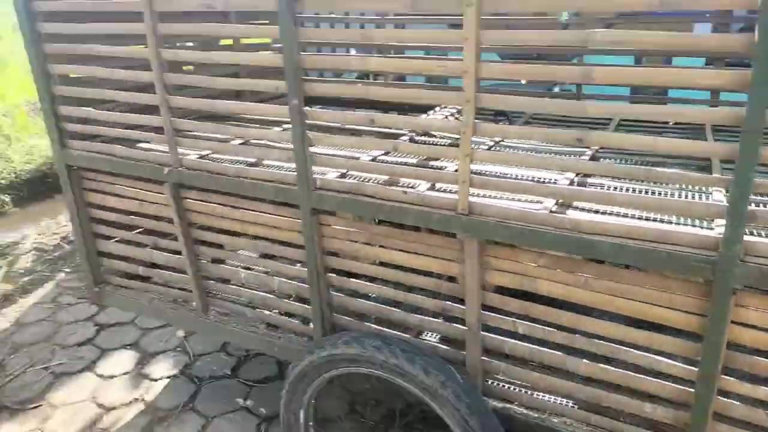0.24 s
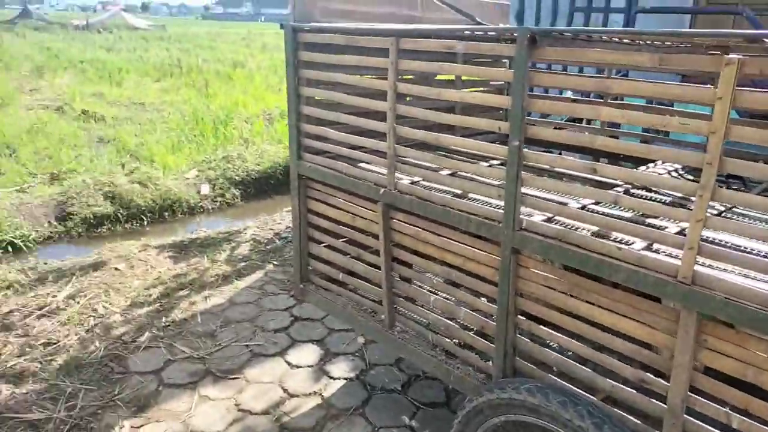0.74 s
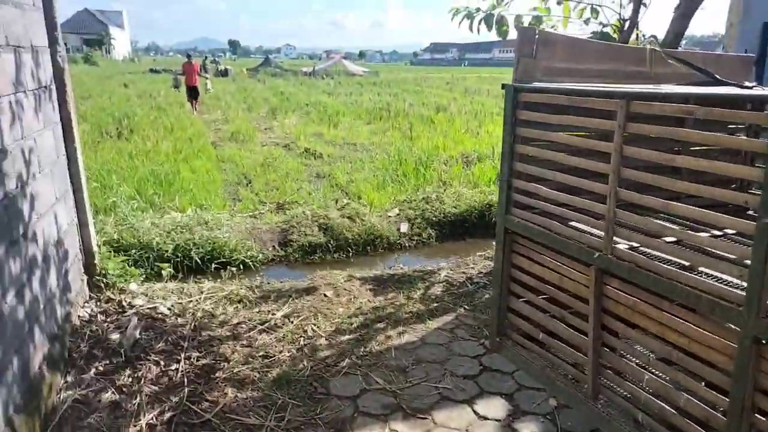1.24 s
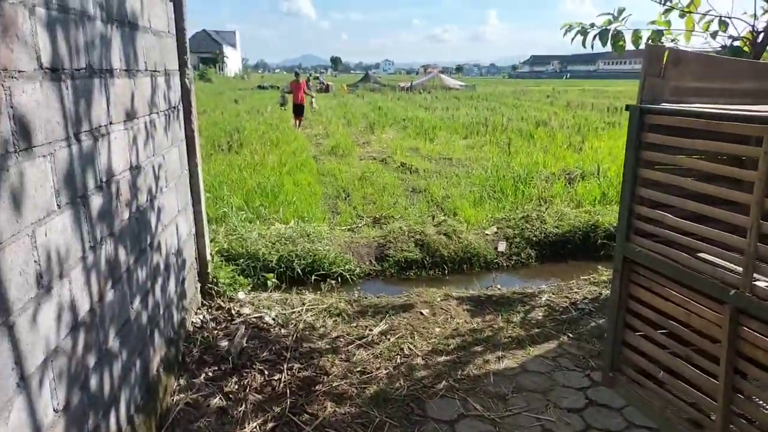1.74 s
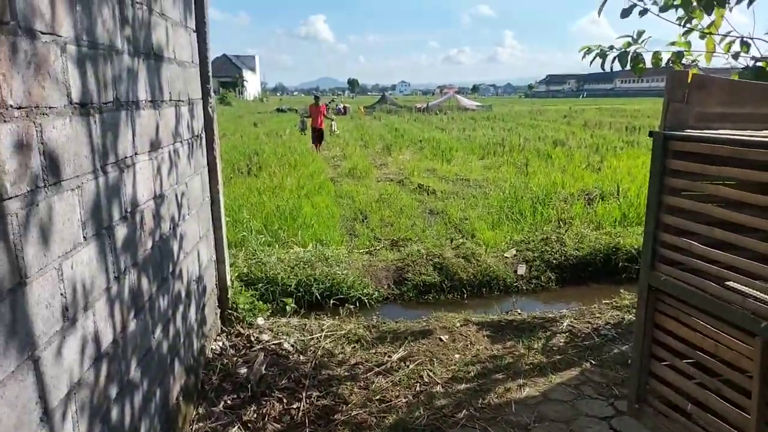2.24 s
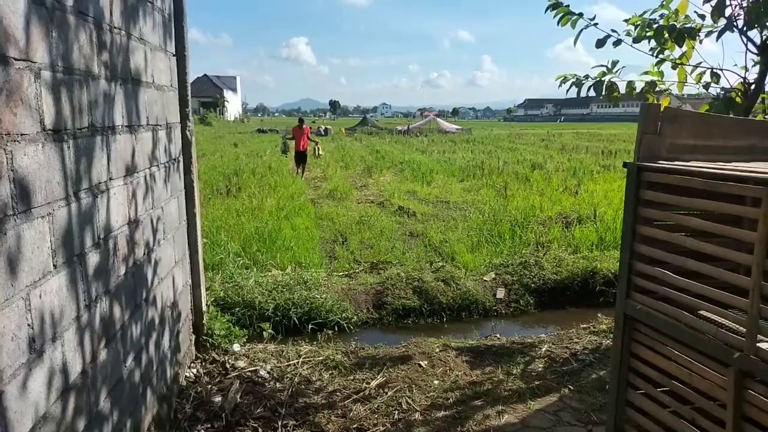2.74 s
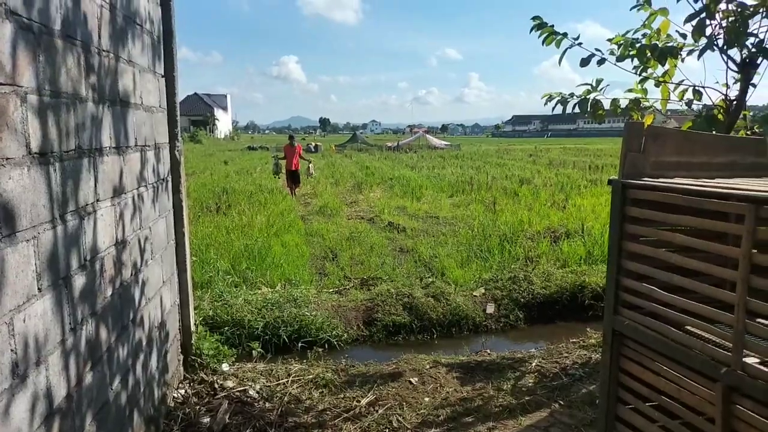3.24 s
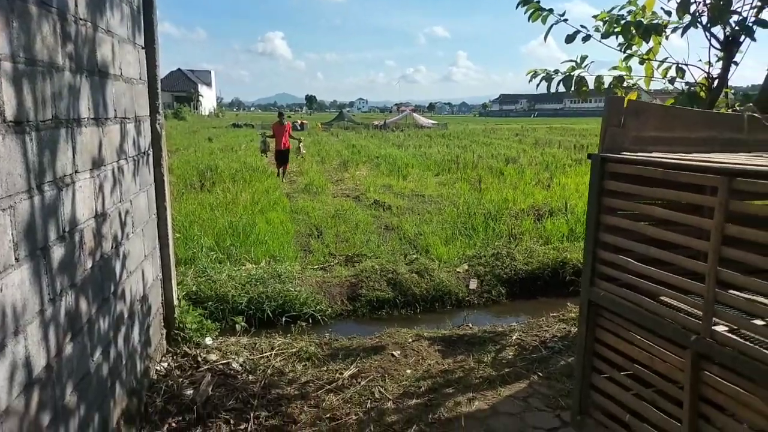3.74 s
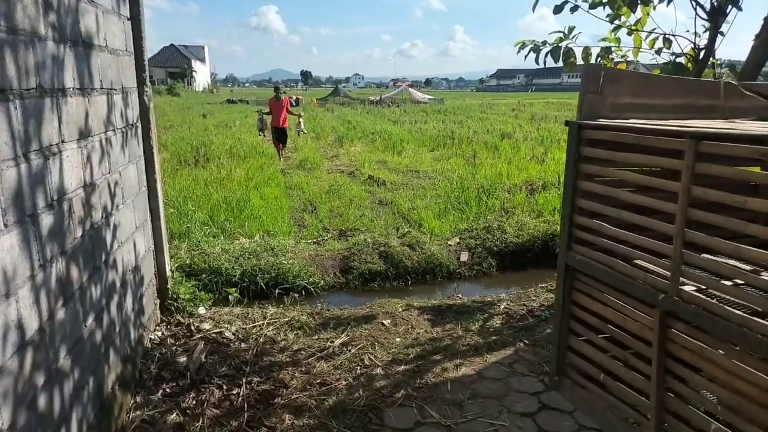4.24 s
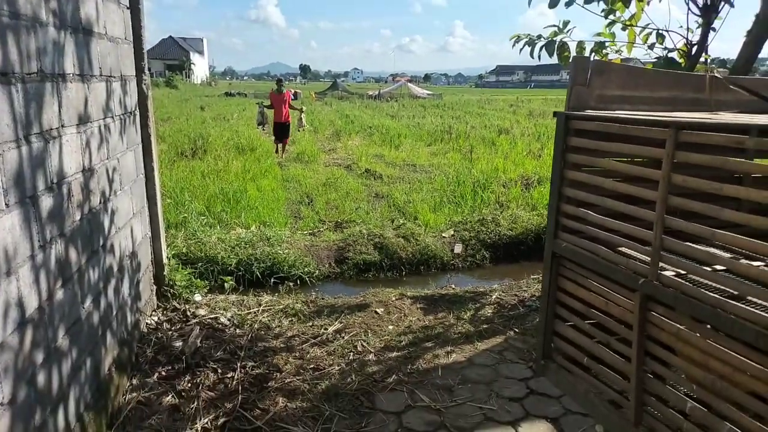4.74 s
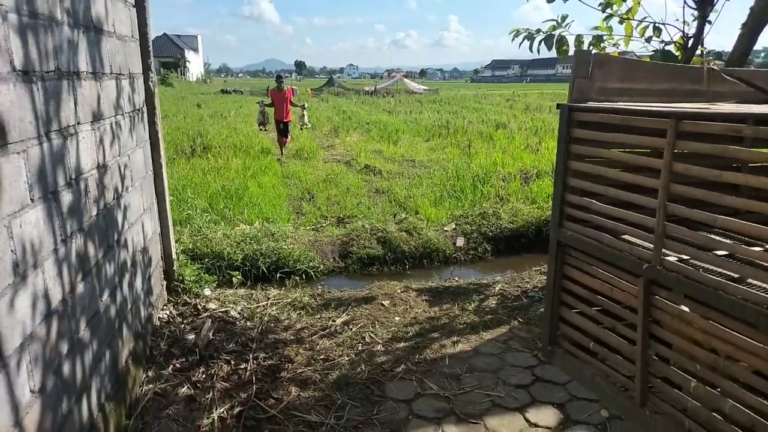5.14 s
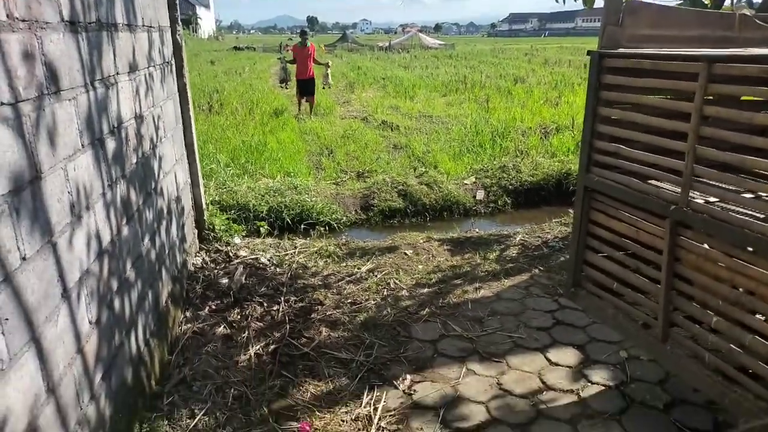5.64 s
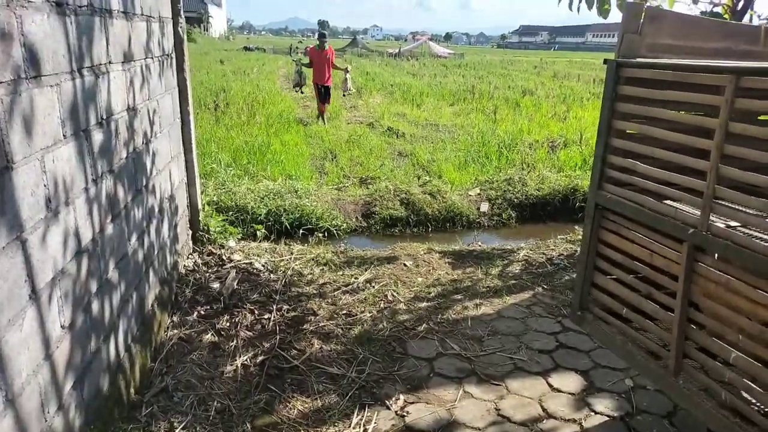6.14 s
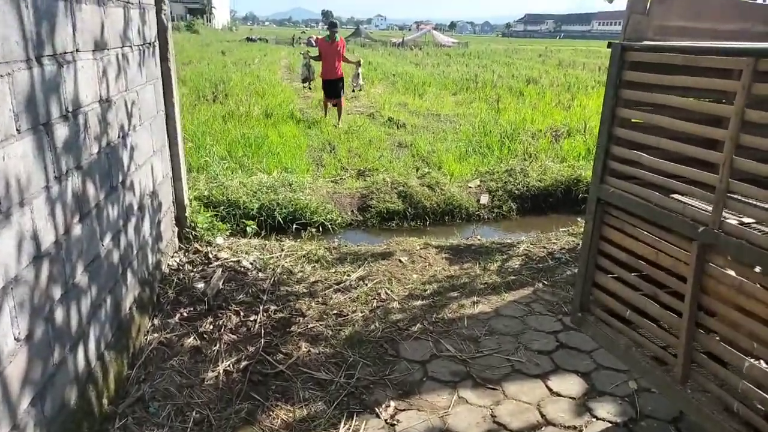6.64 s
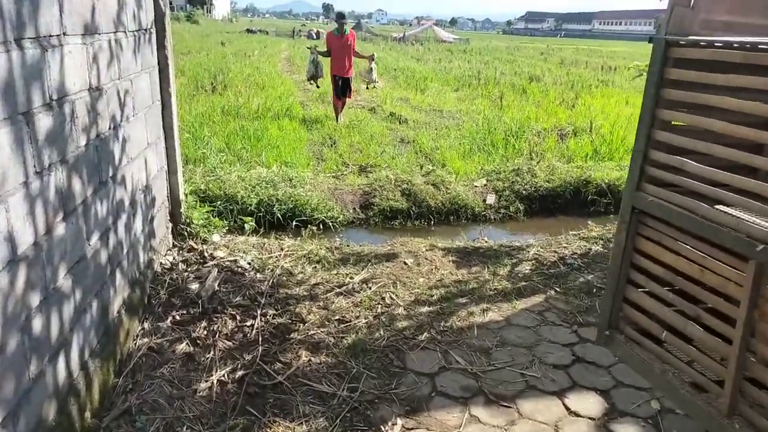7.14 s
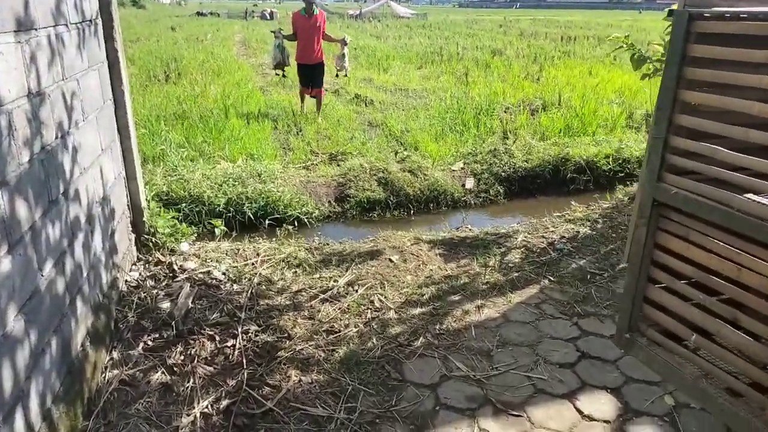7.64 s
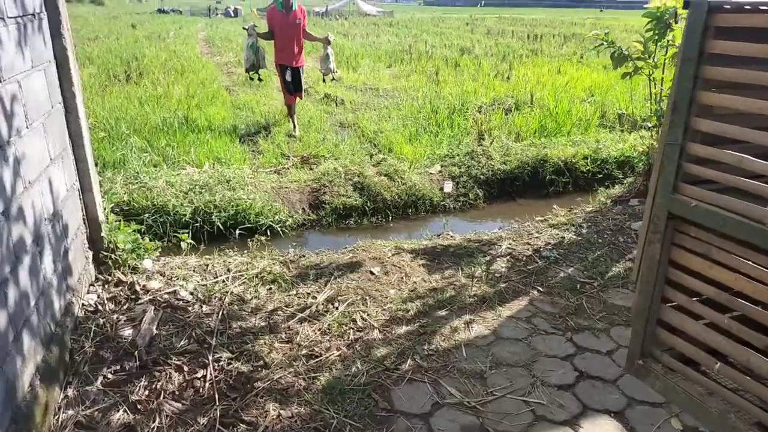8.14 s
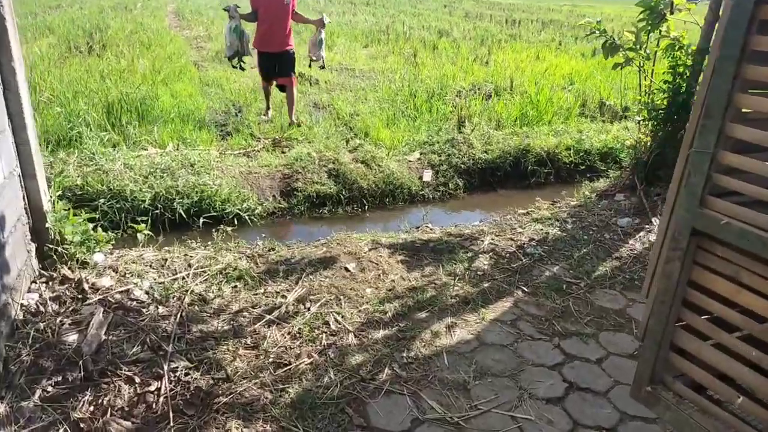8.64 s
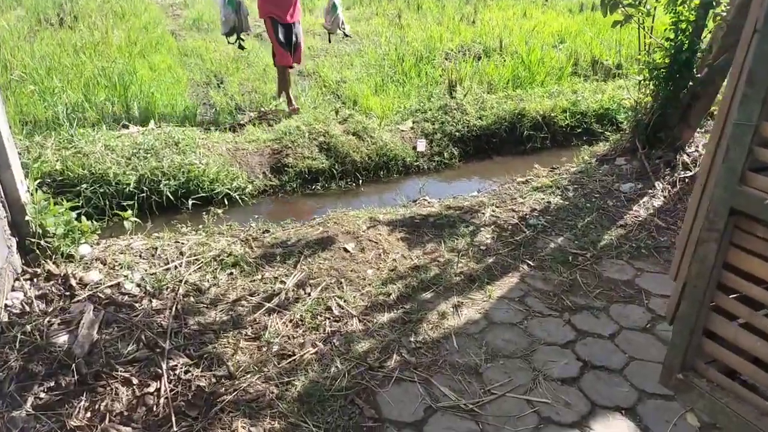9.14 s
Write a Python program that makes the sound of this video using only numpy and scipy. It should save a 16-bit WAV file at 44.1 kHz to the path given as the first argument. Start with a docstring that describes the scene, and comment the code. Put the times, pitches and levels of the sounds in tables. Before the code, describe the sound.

Domestic ducks quack in short, hoarse calls, about three a second, at the edge of a field. Softer quacks come first, then louder ones mixed with a few distant answers, each with a slight echo from a wall and a slatted cage. Dry leaves and straw rustle and crunch close to the microphone throughout. A few small bird peeps sound early on, over a faint motor hum and light wind.

```python
"""At the edge of a field, beside a slatted cage and a wall, ducks quack in short hoarse calls.
Pulses and puffs of air ring each duck's chest, neck and throat; slats and wall echo the calls.
Dry leaves and straw rustle and crunch close by in tiny snaps, and small birds or ducklings peep.
A far motor hums, light wind puffs on the microphone, and a limiter holds down the loudest calls."""
import sys
import numpy as np
from scipy import signal
from scipy.fft import rfft, irfft
from scipy.io import wavfile
from scipy.ndimage import uniform_filter1d, minimum_filter1d

SR = 44100
rng = np.random.default_rng(int(sys.argv[2]) if len(sys.argv) > 2 else 0)


def bounce(signal):
    """Save signal as a 16-bit WAV file at the path given by the first command-line argument."""
    frames = np.transpose(np.atleast_2d(signal))
    limited = np.clip(frames, -1, 1)
    pcm = np.round(limited * 32767).astype(np.int16)
    wavfile.write(sys.argv[1], SR, pcm)


N = 414540
LEAD_S = .03  # murmur ahead of each quack

# Duck voices: glide_ratio, opening_s, murmur_db, neck_hz, upper_throat_hz, ring_hz,
# chest_db, rasp_db
DEEP = (.03, .005, -50, 510, 1850, 3900, -38, -6.5)
SOFT = (.02, .006, -36, 960, 1860, 4000, -21, -13)
LOUD = (.01, .004, -66, 815, 1790, 3780, -32, -12)
FULL = (.03, .005, -60, 680, 1760, 3790, -27, -12)
FAR = (-.025, .005, -55, 910, 1760, 4030, -26, -13.5)
DROOP = (-.09, .006, -34, 830, 1760, 3950, -21, -10)
CHESTY = (-.03, .005, -56, 860, 1740, 3740, -22, -10.5)
# Top-end spectrum of dry leaves: freq_hz, density_db
CRISP_SPECTRUM = [(8000, -34), (9500, -9), (11000, -1), (12000, 4), (14500, 5), (15800, -10)]


def gain_of(db):
    """Decibels to amplitude factor."""
    return 10 ** (np.asarray(db) / 20)


def unit_rms(x):
    """Scale to rms 1."""
    return x / np.sqrt(np.mean(x ** 2) + 1e-20)


def log_interp(points, hz):
    """Table value on a log-frequency axis."""
    freq_hz, value = np.transpose(points)
    return np.interp(np.log(hz + 1), np.log(freq_hz + 1), value)


def envelope(rows):
    """Rows of time_s, level_db to gain per sample."""
    return gain_of(np.interp(np.arange(N) / SR, *np.transpose(rows)))


def add(mix, start_s, sound):
    """Mix a sound in at start_s."""
    part = mix[max(round(start_s * SR), 0):][:len(sound)]
    part += sound[:len(part)]


def resonate(x, hz, width_hz):
    """Steep resonance, rms 1: shift hz to zero, smooth twice, shift back."""
    carrier = np.exp(2j * np.pi * np.cumsum(hz * np.ones(len(x))) / SR)
    pole = np.exp(-np.pi * width_hz / SR)
    return unit_rms((carrier * signal.lfilter([1], np.poly([pole, pole]), x / carrier)).real)


def coloured(x, spectrum):
    """Filter by a spectrum table, rms 1."""
    gain = gain_of(log_interp(spectrum, np.fft.rfftfreq(len(x), 1 / SR)))
    return unit_rms(irfft(rfft(x) * gain, len(x)))


def drift(cutoff_hz):
    """Slow random wander, rms 1."""
    lowpass = signal.butter(2, cutoff_hz, fs=SR, output="sos")
    return unit_rms(signal.sosfilt(lowpass, rng.standard_normal(N)))


def crackle(rate_hz, spread_db, hiss):
    """Tiny snaps of uneven size over hiss."""
    snaps = (rng.random(N) < rate_hz / SR) * gain_of(spread_db * np.minimum(rng.exponential(1, N), 4))
    return unit_rms(snaps * rng.standard_normal(N)) + hiss * rng.standard_normal(N)


def patchy(x, depth_db):
    """Short narrow patches of the spectrum stand out or drop away."""
    bands = signal.stft(x, nperseg=256)[2]
    patches = uniform_filter1d(rng.standard_normal(bands.T.shape), size=7, axis=0)
    patches = unit_rms(uniform_filter1d(patches, size=2, axis=1)).T
    return unit_rms(signal.istft(bands * gain_of(depth_db * patches), nperseg=256)[1][:len(x)])


def rustle():
    """Straw and leaves stir throughout, in quick uneven waves."""
    # Stirring: time_s, relative_db
    levels = [(0.0, -42.5), (0.52, -48), (0.83, -48), (1.49, -50.5), (5.15, -50), (5.66, -55), (6.88, -46),
              (7.25, -51), (7.49, -45.5), (8.27, -47.5), (9.4, -44)]
    # Leaves: freq_hz, density_db
    leaf_spectrum = [(180, -10), (300, 3.5), (632, -4), (838, -1.5), (1600, -0.5), (1790, 0.5), (2340, -9),
                     (3910, 1), (4610, -8.5), (7090, -6), (9400, -28.5), (14700, -42), (15700, -18)]
    waves = gain_of(7.5 + 2.33 * drift(25)) * envelope(levels)
    snaps = patchy(crackle(7500, spread_db=1.1, hiss=2.0), depth_db=2.3)
    fizz = gain_of(17.3) * waves * coloured(snaps, CRISP_SPECTRUM)  # top grows faster than the rest
    return waves * (coloured(snaps, leaf_spectrum) + fizz)


def open_air():
    """Low, gently wavering outdoor wash."""
    # freq_hz, density_db
    spectrum = [(12, -39), (20, -23), (53, 12), (172, 10.5), (255, 15.5), (439, -29), (507, 10),
                (972, -19), (1400, -21), (1500, -23), (1950, -27), (3300, -120)]
    return gain_of(-50 + 1.2 * drift(2)) * coloured(rng.standard_normal(N), spectrum)


def wind():
    """Light wind rumbles on the microphone, with one stronger puff."""
    # Rumble: time_s, relative_db
    levels = [(0.0, -54), (2.22, -58), (3.87, -57), (4.0, -38.5), (4.24, -56), (9.4, -61)]
    return gain_of(2) * envelope(levels) * resonate(rng.standard_normal(N), hz=45, width_hz=54)


def motor(hum_hz=120.4):
    """A far motor: one tone, wavering in pitch and level."""
    # Hum: time_s, relative_db
    levels = [(0, -52), (.8, -45.5), (1.4, -47.5), (1.8, -57), (2.3, -43.5), (2.7, -49.5), (3.2, -62),
              (3.8, -48.5), (4.5, -70), (5.4, -46), (5.9, -51), (6.5, -54), (9.4, -58.5)]
    tone = np.sin(2 * np.pi * np.cumsum(hum_hz + 1.2 * drift(3.1)) / SR)
    return envelope(levels) * tone * gain_of(-0.5 + 0.81 * drift(9.7))


def crunches(t60_s=.15, attack_s=.001):
    """Leaves give way at once and keep snapping for a moment."""
    # Clearest crunches: start_s, level_db, dull_db, crisp_db
    distinct = [(0.0124, -24, -10, -18), (0.509, -25.5, -15, -32), (0.795, -30, -21, -31),
                (0.86, -25.5, -6, -29), (1.0032, -16.5, -35, -18), (1.8921, -31, -0.5, -20),
                (2.159, -33, -7, -21), (2.512, -29.5, -6, -29), (3.065, -32, -24, -19),
                (3.231, -31.5, -2.5, -22), (3.846, -27.5, -6.5, -30), (4.123, -32, -1, -24),
                (4.614, -31, 2.5, -18), (5.003, -34, -32, -13), (5.1437, -29, -9, -35),
                (5.2666, -29.5, -40, -30), (5.384, -35, -5, -21), (5.673, -34, -1.5, -16),
                (6.0954, -36, -33, -14), (6.5066, -31, -5, -23), (6.913, -25, -6, -25),
                (6.968, -28, -5, -16.5), (7.3053, -31, 3, -22), (7.3926, -21, -6, -18),
                (7.6131, -32.5, -5, -20), (7.8825, -26, -7.5, -24), (8.1615, -28, -2, -31),
                (8.374, -30, -25, -22), (8.4522, -34, -18, -8), (8.5694, -26, -6.5, -16),
                (8.747, -24.5, -9, -14), (8.829, -28, -4.5, -24), (8.8925, -24.5, -6.5, -19)]
    # Main part of a crunch: freq_hz, density_db
    spectrum = [(300, -24), (900, -23), (2500, -14), (3800, 3.5), (4700, -3.5), (5700, -2.5), (7300, -2.5),
                (9200, -20), (12000, -31)]
    snaps = patchy(crackle(13000, spread_db=1.3, hiss=1.7), depth_db=2.8)
    bright = coloured(snaps, spectrum)
    crisp = coloured(crackle(2500, spread_db=3.0, hiss=.5), CRISP_SPECTRUM)
    dull = unit_rms(signal.sosfilt(signal.butter(2, [400, 2200], "band", fs=SR, output="sos"), snaps))
    faint = [(start_s, *rng.normal((-37, -8, -22), 3.0)) for start_s in rng.uniform(0, N / SR, 12)]
    t, out = np.arange(8000) / SR, np.zeros(N)
    for start_s, level_db, dull_db, crisp_db in distinct + faint:
        shape = gain_of(level_db - 60 * t / t60_s) * (1 - np.exp(-t / attack_s))
        span = slice(round(start_s * SR), round(start_s * SR) + len(t))
        sound = bright[span] + gain_of(dull_db) * dull[span] + gain_of(crisp_db) * crisp[span]
        add(out, start_s, sound * shape[:len(sound)])
    return out


def quack(duck, length_s, peak_ratio, effort_db, pitch_hz, rough, lower_hz, upper_db, neck_db, ring_db):
    """Uneven pulses and air puffs excite chest, neck and throat; a bright ring sits near 3.8 kHz."""
    # Rasp resonances: centre_hz, width_hz, relative_db
    rasp_bands = ((2265, 750, -1), (2960, 113, -6), (5286, 290, -2), (5780, 380, -5), (7210, 1750, -6.5))
    glide, opening_s, murmur_db, neck_hz, upper_hz, ring_hz, chest_db, rasp_db = duck
    t = np.arange(-LEAD_S, 1.2 * length_s, 1 / SR)
    progress = np.clip(t / length_s, 0, 1)
    noise = rng.standard_normal((3, 7000))[:, :len(t)]
    smear, band_levels, band_shifts = rng.standard_normal((3, 40))
    wobble = unit_rms(uniform_filter1d(noise[0], size=500))
    shimmer = unit_rms(uniform_filter1d(noise[1], size=200))

    arch = .055 * (np.sin(np.pi * progress) - .7)
    bend = 1 + glide * (2 * progress - 1) + arch + (.0104 + .07 * rough) * wobble
    cycles = np.cumsum(pitch_hz * bend) / SR
    partials = np.cos(2 * np.pi * np.arange(1, 41)[:, None] * cycles + 1.22 * smear[:, None])
    alternation = 1 + .63 * rough * np.cos(np.pi * cycles)  # strong pulse, weak pulse
    pulses = unit_rms(partials.sum(0) * gain_of(5.2 * rough * shimmer) * alternation)
    puffs = unit_rms((.55 + np.exp(-(cycles % 1) / .79)) * noise[2])
    clear, hoarse, airy = (np.sqrt(1 - breath) * pulses + np.sqrt(breath) * puffs
                           for breath in (.3 * rough, .38 * rough, .6 * rough))

    shut = np.exp(-np.maximum(t + .0033, 0) / opening_s)  # the mouth opens at the onset
    open_gain = gain_of(-26 * shut)
    gape = 1 - .29 * shut - .043 * np.clip(t / length_s, 0, 2) ** 3  # resonances scoop up, then sag
    lower = resonate(hoarse, lower_hz * gape, 280)
    upper = gain_of(upper_db) * open_gain * resonate(hoarse, upper_hz * gape, 270)
    throat = resonate(lower - upper, 1450, 1200)
    neck = unit_rms(resonate(clear, neck_hz, 220) + .8 * resonate(clear, 900, 350))
    ring_broad = resonate(resonate(airy, ring_hz, 1000), ring_hz, 1000)
    ring = unit_rms(resonate(airy, ring_hz * (1 + .03 * wobble), 280) + .9 * ring_broad)
    rasp = unit_rms(sum(
        gain_of(db + 2.6 * level) * resonate(airy, hz * (1 + .047 * shift + .018 * wobble), width_hz)
        for (hz, width_hz, db), level, shift in zip(rasp_bands, band_levels, band_shifts)))
    chest = resonate(clear, 214, 130) - gain_of(-1) * resonate(clear, 430, 260)
    open_parts = gain_of(chest_db) * chest + gain_of(ring_db) * ring + gain_of(rasp_db) * rasp
    voice = throat + open_gain * open_parts - gain_of(neck_db) * neck

    knots_s = [-LEAD_S, -.002, .007, peak_ratio * length_s, .93 * length_s, 1.1 * length_s]
    swell_db = np.interp(t, knots_s, [murmur_db, -7.5, 1.5, 4.5, 1.5, -27.5])
    fade_in = np.minimum((t + LEAD_S) / .006, 1)
    return gain_of(effort_db + swell_db) * voice * fade_in


def ducks():
    """Ducks trade short calls."""
    # start_s, duck, length_s, peak_ratio, effort_db, pitch_hz, roughness_ratio,
    # lower_throat_hz, upper_throat_db, neck_db, ring_db
    # The row at 1.761 s is a faint echo-like tail of the preceding loud quack.
    calls = [(0.131, DEEP, 0.029, .6, -37.5, 250.4, 0.48, 1280, 6, -4, 7.5),
             (0.225, SOFT, 0.07, .2, -24.5, 213.8, 0.5, 1030, -2, -8, 0),
             (0.452, SOFT, 0.043, .4, -20, 249.7, 0.45, 1370, 5, -3, -8.5),
             (0.67, DEEP, 0.052, .4, -23.5, 237.8, 0.3, 1340, -2, -3, 3),
             (0.92, DEEP, 0.055, .44, -23, 260.4, 0.3, 1080, 2.5, -3, -2.5),
             (1.151, DEEP, 0.059, .62, -21.5, 270.6, 0.25, 1360, 2, -1.5, -2.5),
             (1.309, LOUD, 0.073, .4, -19, 193.3, 0.2, 1530, -2, -4.5, 0),
             (1.372, DEEP, 0.083, .26, -23.5, 236.3, 0.4, 1330, 0, -3.5, -5),
             (1.644, LOUD, 0.076, .2, -17, 214.5, 0.47, 1250, -5, -17, 0),
             (1.761, FAR, 0.037, .8, -35, 214, 0.59, 1370, -5, -35, -29),
             (1.848, DEEP, 0.07, .6, -47, 242.3, 0.46, 1360, 10, 3.5, -9),
             (1.964, LOUD, 0.074, .2, -16.5, 201.5, 0.71, 1330, 2.5, -21, -5),
             (2.292, SOFT, 0.033, .5, -44.5, 181, 0.61, 1500, 14, -25, -17),
             (2.365, LOUD, 0.071, .35, -16, 195.5, 0.37, 1264, 0.5, -19, -7),
             (2.765, LOUD, 0.063, .4, -18.5, 231.5, 0.53, 1283, -2, -6.5, -8),
             (2.957, FAR, 0.05, .42, -38, 173.5, 0.2, 1250, 12, -13, -9),
             (3.117, LOUD, 0.051, .35, -17, 222.8, 0.57, 1330, -3, -10.5, -15),
             (3.209, FAR, 0.076, .6, -34, 174, 0.58, 1340, 9, -21, -13),
             (3.484, FAR, 0.088, .3, -32.5, 236, 0.44, 1370, 9, -14.5, -13),
             (3.753, FAR, 0.078, .85, -34.5, 231, 0.3, 1315, 5, -13, -11),
             (4.005, FULL, 0.071, .64, -16.5, 262.3, 0.36, 1244, 0.5, -6.5, -4.5),
             (4.303, LOUD, 0.072, .2, -18.5, 188.5, 0.48, 1292, -5.5, -14, -0.5),
             (4.586, FAR, 0.075, .5, -34.5, 187.5, 0.4, 1280, 9, -13, -23),
             (4.671, LOUD, 0.073, .47, -16, 223.2, 0.28, 1274, 1, -23.5, -6),
             (5.539, FULL, 0.058, .55, -13.5, 202.8, 0.11, 1355, -4, -14.5, -9),
             (5.833, LOUD, 0.07, .5, -16.5, 232.5, 0.44, 1373, -8, -11.5, -6),
             (6.209, FULL, 0.065, .2, -14.5, 239, 0.22, 1500, -3, -7, -8.5),
             (6.315, DROOP, 0.058, .6, -26, 246, 0.61, 1300, -1, -14, -8.5),
             (6.538, DROOP, 0.056, .53, -20, 176.9, 0.4, 1255, 2.5, -11.5, -9),
             (6.756, DROOP, 0.062, .37, -19.5, 175.7, 0.33, 1300, 6, -15.5, -8),
             (6.99, DROOP, 0.044, .4, -16, 197, 0.35, 1345, 8.5, -15.5, -12.5),
             (7.208, DROOP, 0.06, .25, -15, 216, 0.28, 1360, 8, -21, -15.5),
             (7.443, CHESTY, 0.058, .54, -19.5, 197, 0.42, 1300, 4.5, -12.5, -9.5),
             (7.681, DROOP, 0.054, .6, -14, 210.8, 0.28, 1400, 3, -18.5, -18),
             (7.935, CHESTY, 0.061, .2, -16, 186, 0.63, 1340, -1, -9.5, -9.5),
             (8.283, CHESTY, 0.057, .43, -14, 192.8, 0.59, 1366, 2, -16, -4),
             (8.597, FULL, 0.073, .47, -16, 221.2, 0.15, 1350, 3, -12, -7.5),
             (8.938, CHESTY, 0.074, .43, -17.5, 231.6, 0.47, 1474, 5, -7, -1.5),
             (9.214, CHESTY, 0.048, .3, -36, 242, 0.76, 1170, -3, -8, 2),
             (9.283, CHESTY, 0.085, .38, -16.5, 233.7, 0.59, 1323, 4, -10, -3)]
    out = np.zeros(N)
    for start_s, *call in calls:
        add(out, start_s - LEAD_S, quack(*call))
    return out


def echoes(calls):
    """Wall and cage slats reflect the calls: sparse taps, each band decaying at its own rate."""
    # Echo decay: freq_hz, early_t60_s
    decay_times = [(200, 0.42), (600, 0.17), (1500, 0.16), (4000, 0.21), (8000, 0.36)]
    taps = np.zeros(SR // 2)
    slots = np.arange(300, len(taps) - 20, 20)
    taps[slots + rng.integers(0, 20, slots.shape)] = rng.choice([-1., 1.], slots.shape)
    hz, t, bands = signal.stft(taps, SR, nperseg=256)
    far_walls = 1 + .043 * gain_of(179 * np.minimum(t, .2))  # faint late answers
    colour_db = -6.0 * abs(np.log2((hz[:, None] + 50) / 1500))  # mids return best
    decay_db = -60 * t / log_interp(decay_times, hz)[:, None]
    tail = signal.istft(bands * far_walls * gain_of(colour_db + decay_db), SR, nperseg=256)[1]
    return signal.fftconvolve(calls, tail / np.linalg.norm(tail))[:N]


def peeps():
    """Small birds or ducklings: breathy gliding whistles."""
    # Peeps: start_s, length_s, start_hz, end_hz, level_db
    calls = [(0.798, 0.054, 4070, 3120, -29), (0.863, 0.037, 3920, 4050, -33),
             (1.821, 0.053, 1850, 2330, -38.5), (7.149, 0.049, 2960, 2900, -50)]
    out = np.zeros(N)
    for start_s, length_s, start_hz, end_hz, level_db in calls:
        n = round(length_s * SR)
        breath = rng.standard_normal(4000)[:n]
        whistle = resonate(breath, np.linspace(start_hz, end_hz, n), width_hz=160)
        add(out, start_s, gain_of(level_db) * whistle * signal.windows.tukey(n, .5))
    return out


def scene():
    """Mono mix: low-passed birds with echoes, leaves, air, wind and motor."""
    birds = signal.sosfilt(signal.butter(12, 8200, fs=SR, output="sos"), ducks() + peeps())
    mix = birds + gain_of(-11.3) * echoes(birds) + crunches() + rustle()
    return (mix + open_air() + wind() + motor())[None]


def record(dry):
    """A fast limiter lowers the gain around each peak over full scale; then a steep low-pass."""
    allowed_gain = np.minimum(1, 1 / (abs(dry) + 1e-9))
    gain = uniform_filter1d(minimum_filter1d(allowed_gain, size=441), size=221)
    lowpass = signal.firwin(1023, cutoff=15640, window=("kaiser", 9), fs=SR)
    return signal.oaconvolve(gain * dry, lowpass[None], "same")


dry = scene()
out = record(dry)
bounce(out)
```